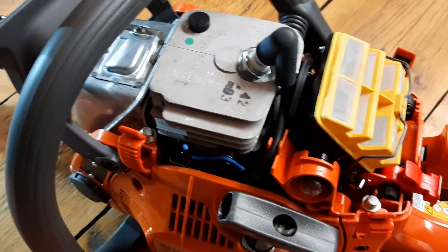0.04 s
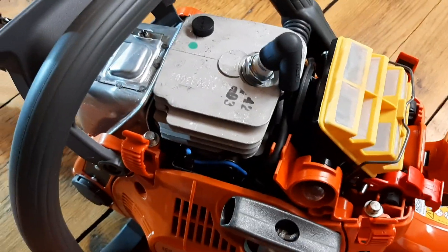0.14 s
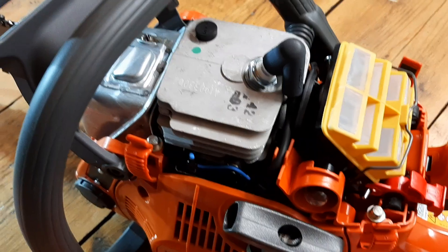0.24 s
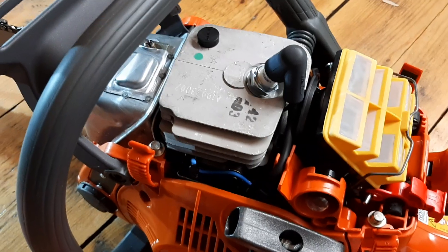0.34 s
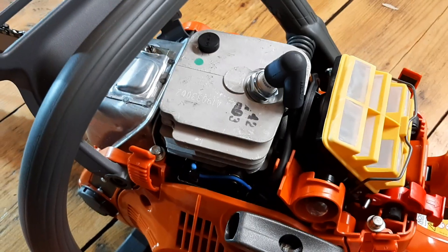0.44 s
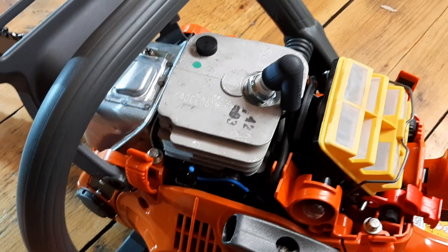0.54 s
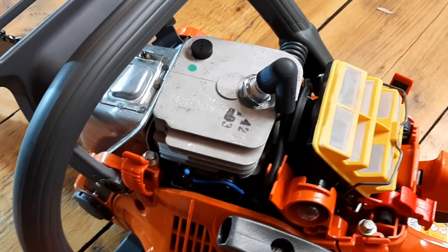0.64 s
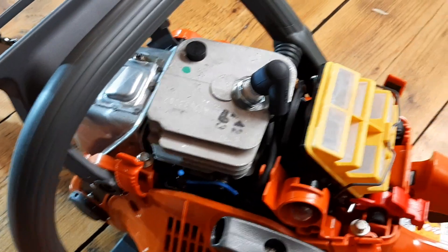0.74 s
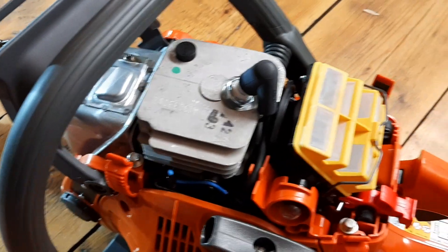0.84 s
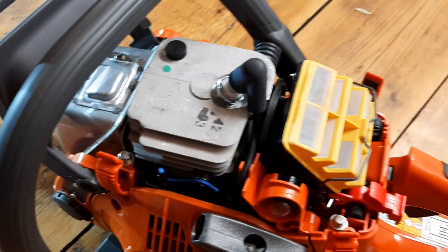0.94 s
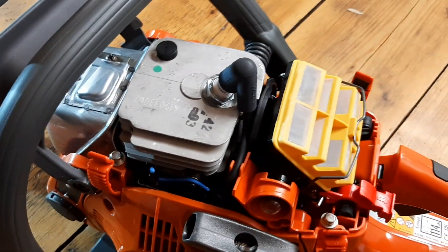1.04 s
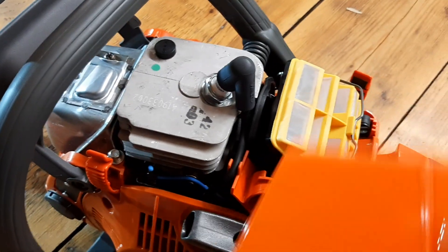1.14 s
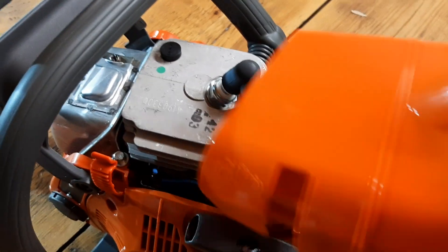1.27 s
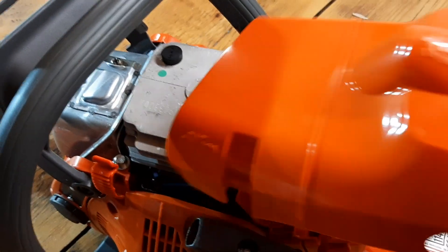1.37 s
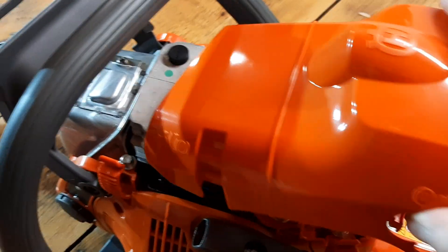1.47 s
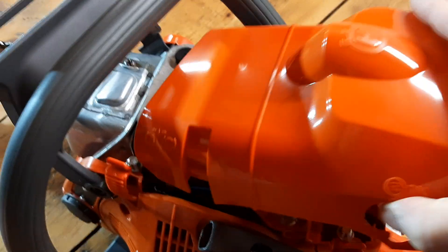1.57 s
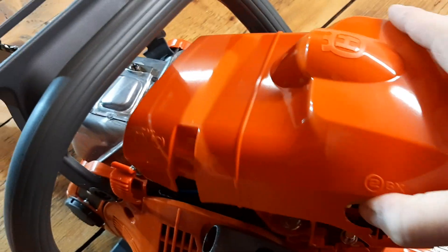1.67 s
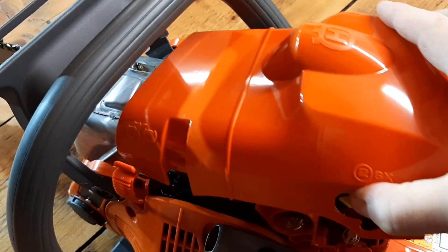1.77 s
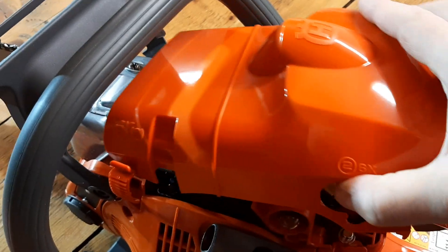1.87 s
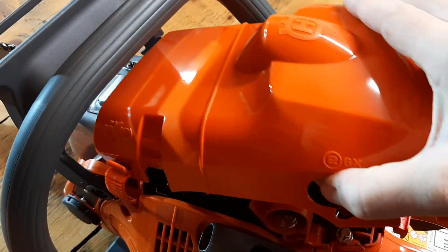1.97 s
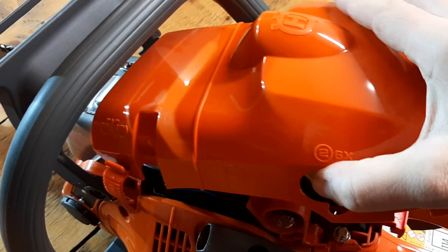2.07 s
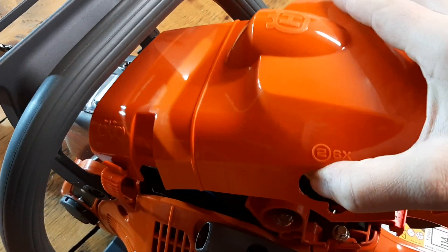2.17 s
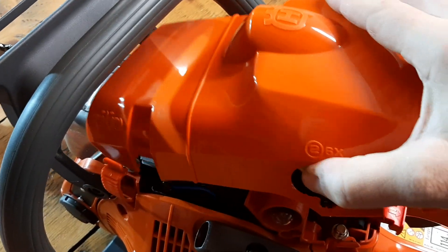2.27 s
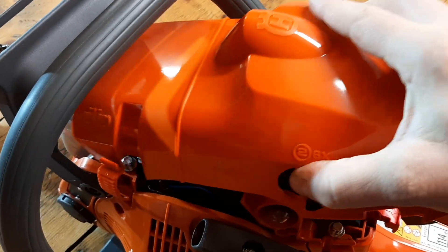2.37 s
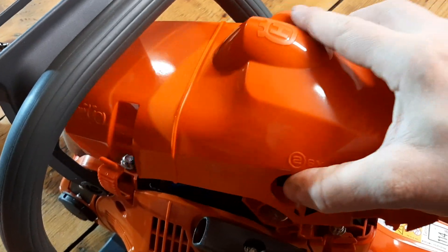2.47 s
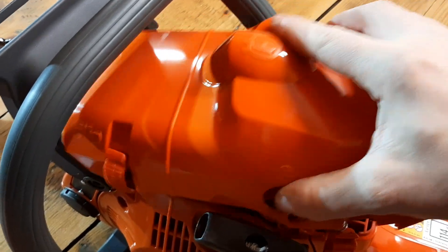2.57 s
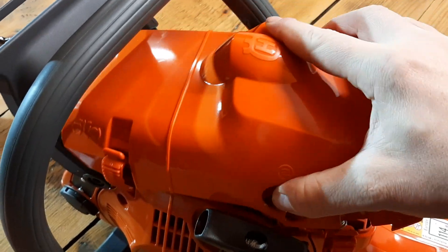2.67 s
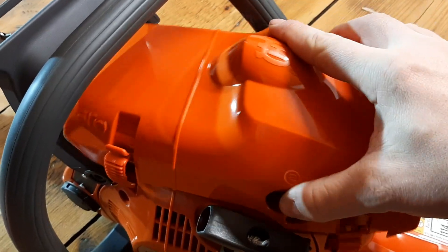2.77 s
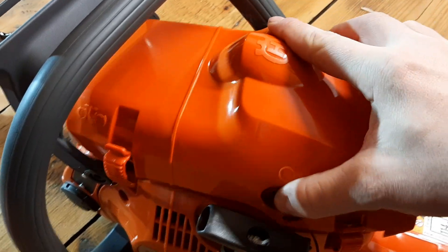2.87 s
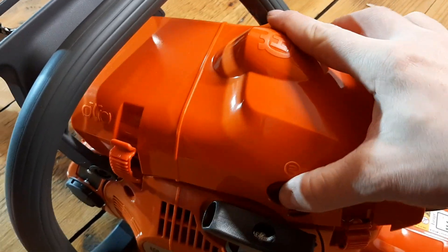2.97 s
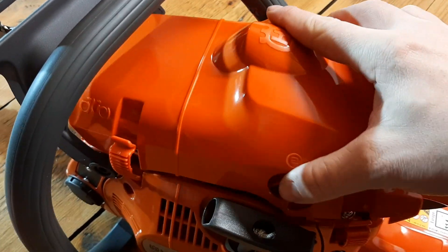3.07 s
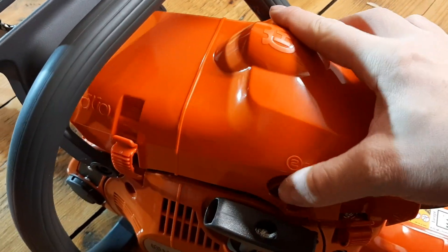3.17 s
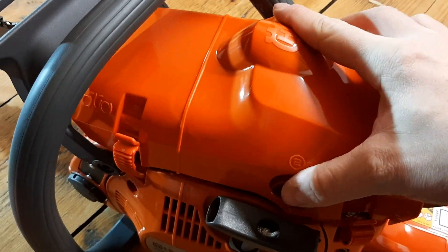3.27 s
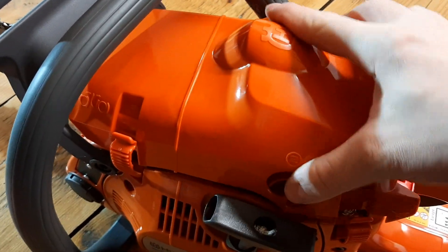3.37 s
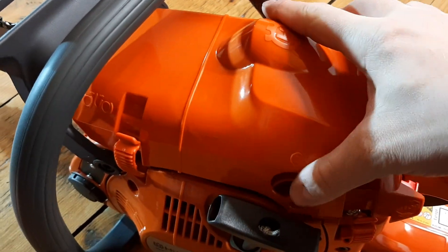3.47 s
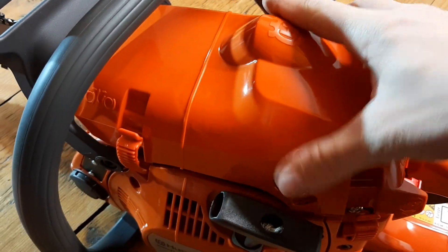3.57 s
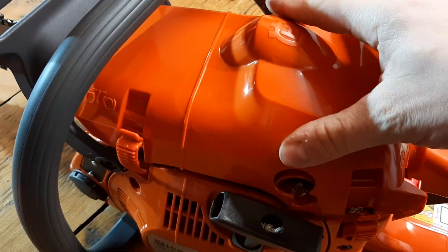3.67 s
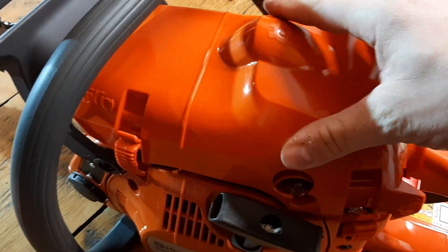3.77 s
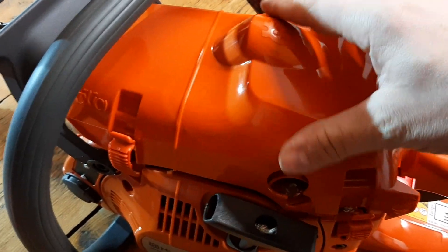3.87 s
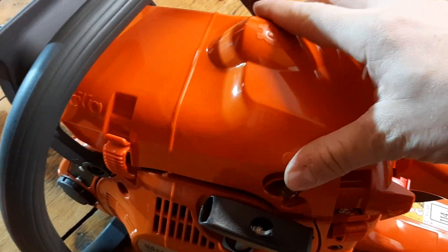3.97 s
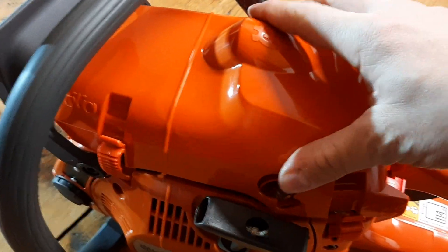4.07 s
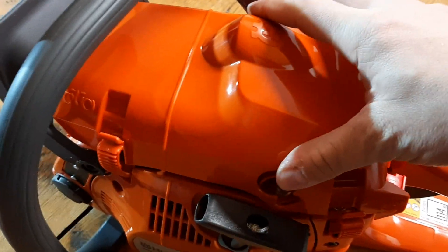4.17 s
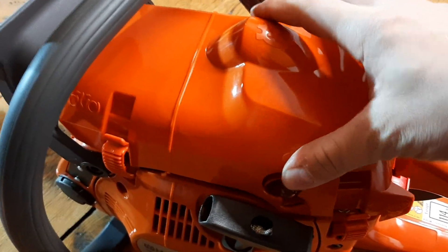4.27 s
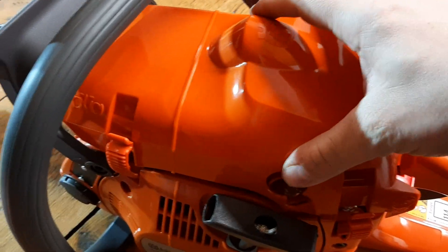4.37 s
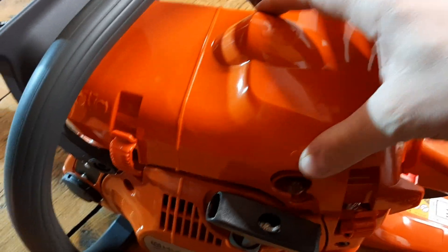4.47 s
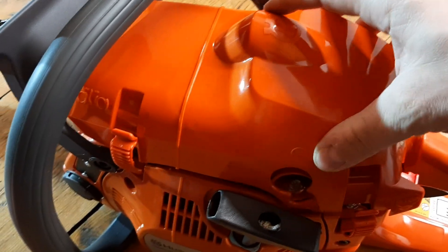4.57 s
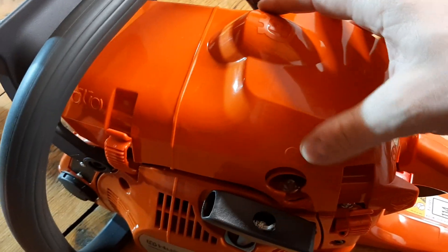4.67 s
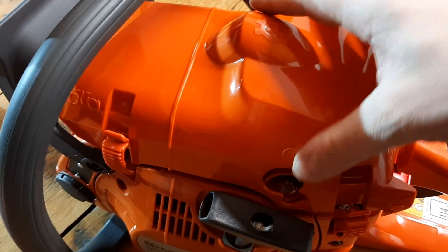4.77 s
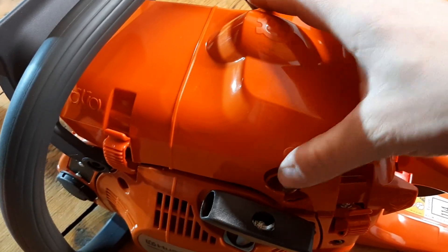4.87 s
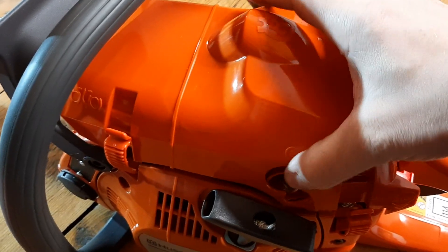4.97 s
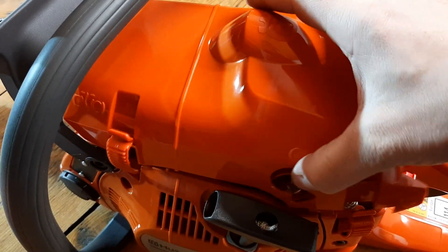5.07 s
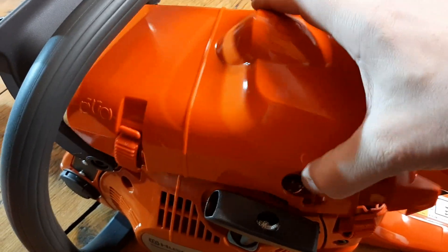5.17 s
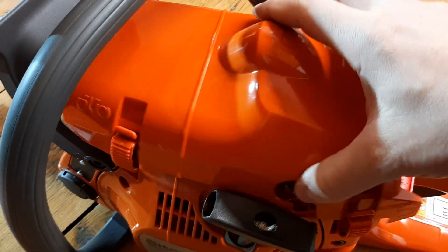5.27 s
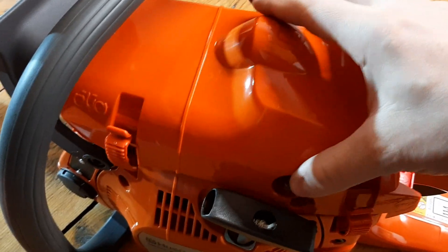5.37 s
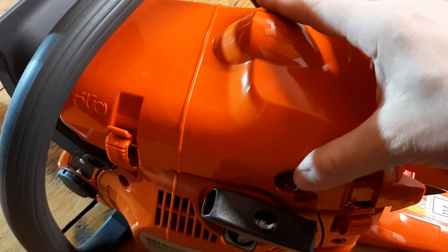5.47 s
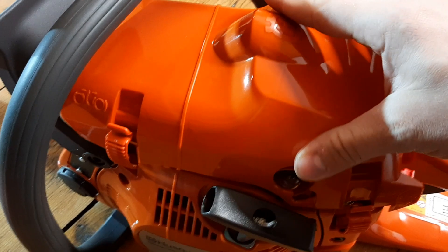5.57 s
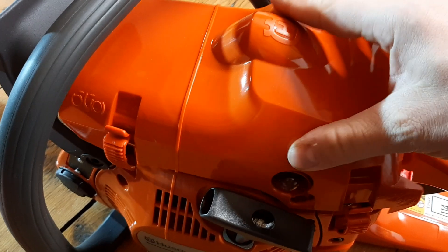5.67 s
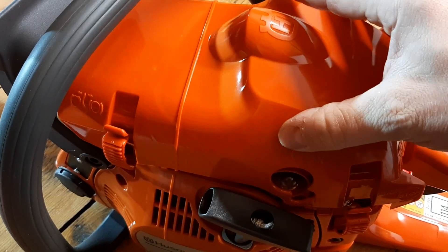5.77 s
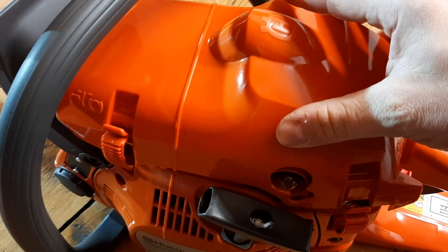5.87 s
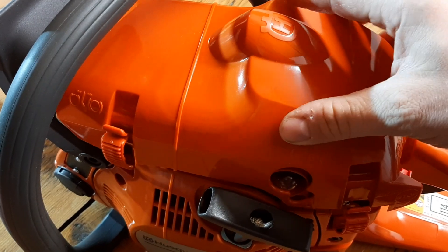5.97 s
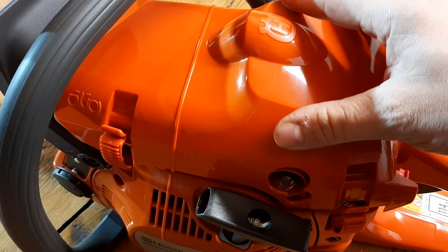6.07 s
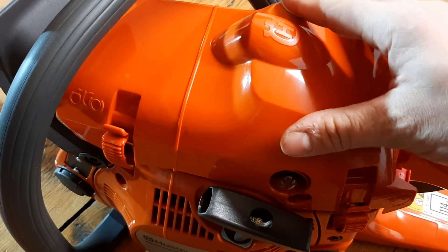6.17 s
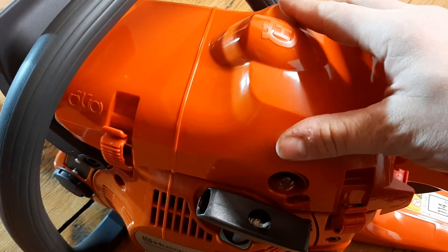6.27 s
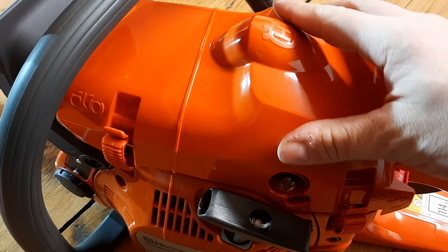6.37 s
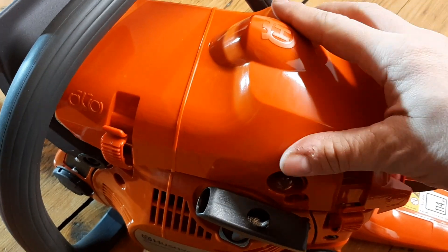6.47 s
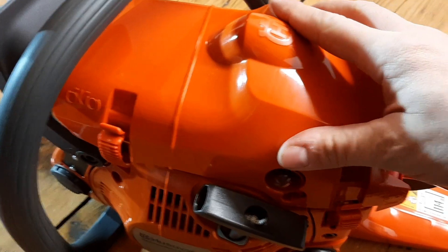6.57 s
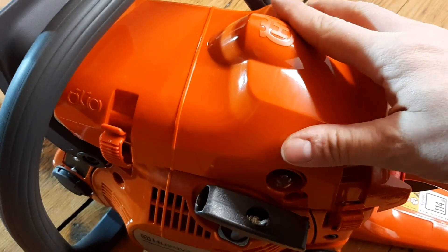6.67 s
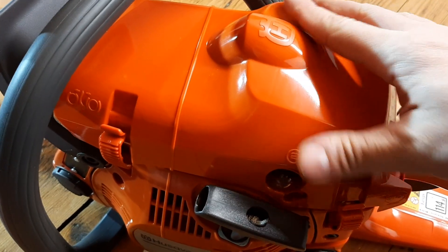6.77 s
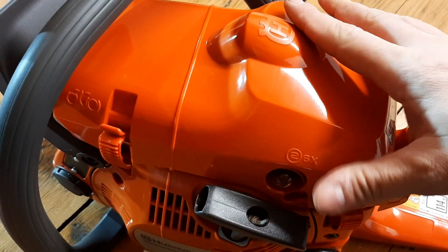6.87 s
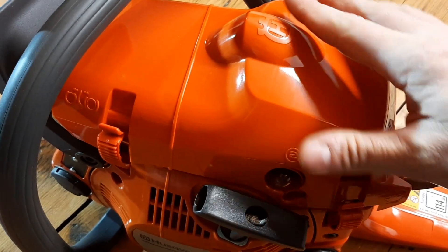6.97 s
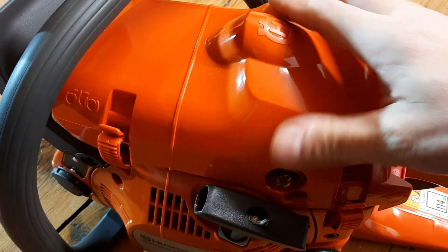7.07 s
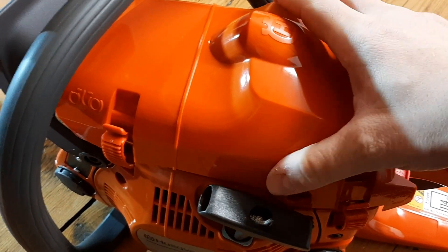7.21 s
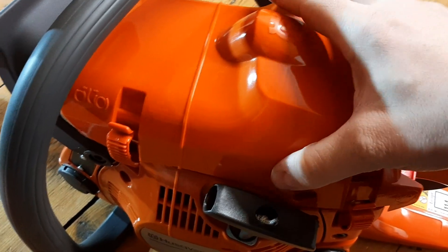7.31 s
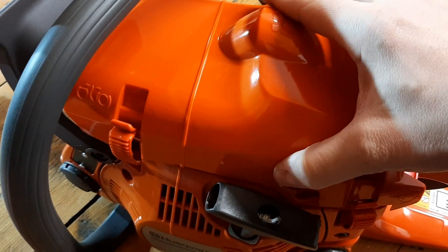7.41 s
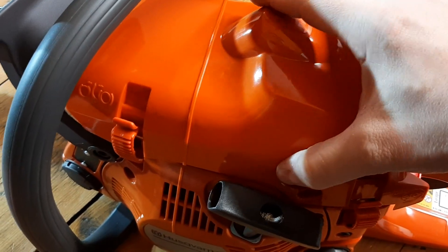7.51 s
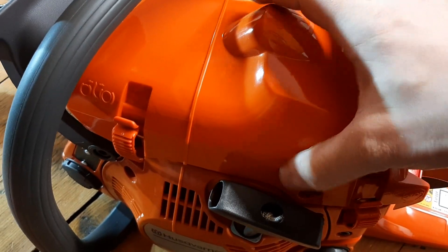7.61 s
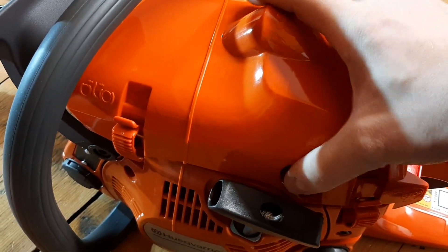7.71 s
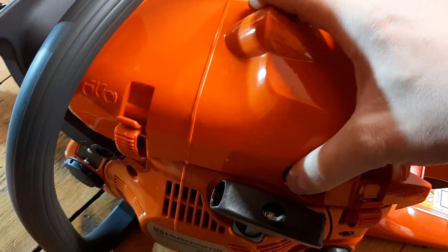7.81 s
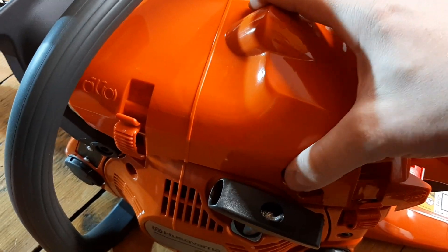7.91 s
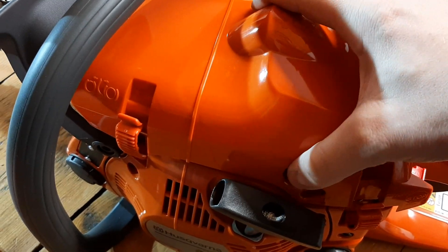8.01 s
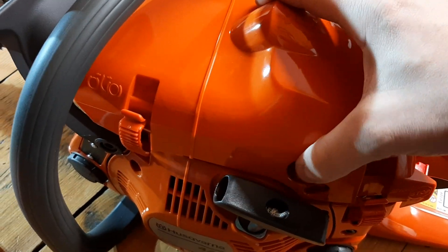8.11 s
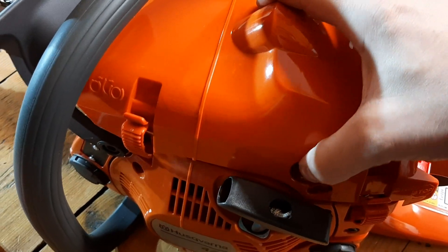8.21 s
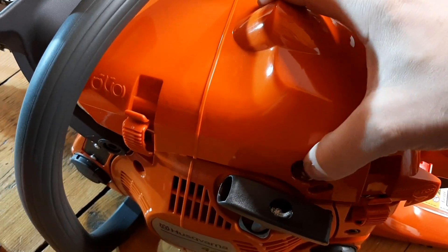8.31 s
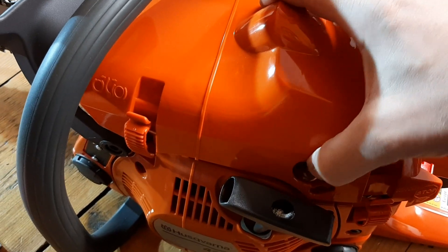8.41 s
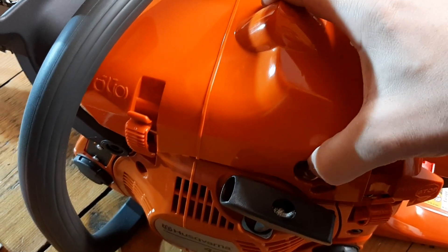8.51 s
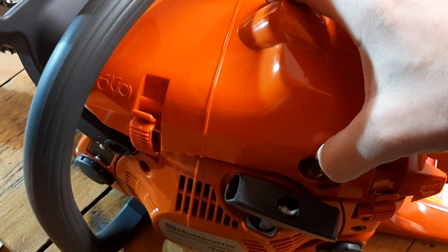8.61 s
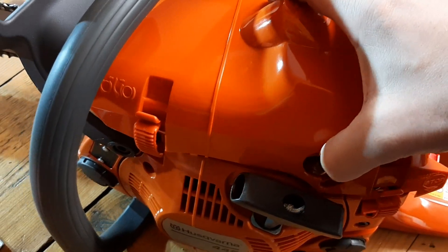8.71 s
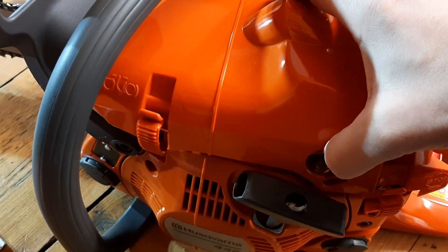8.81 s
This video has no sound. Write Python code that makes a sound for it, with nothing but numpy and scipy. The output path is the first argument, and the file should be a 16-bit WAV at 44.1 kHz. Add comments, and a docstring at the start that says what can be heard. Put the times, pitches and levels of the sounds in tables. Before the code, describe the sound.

Close-up handling of a plastic shell: loose hollow clacks, rubbing skin, sharp seating clicks, sparse firm knocks, then dull thumps on floorboards.

```python
"""Small quiet room with a board floor: a hard plastic cover is handled, slid and pressed onto a small machine.
Knocks and scrapes ring the shell's modes; skin slides over it with a flickering noise hiss.
The machine rocks and bumps the boards, which boom, and a faint tick runs for a while.
Early reflections and a diffuse tail answer the knocks, bumps and ticks; faint coloured noise is the still air."""
import sys
import numpy as np
from scipy import signal
from scipy.fft import rfft, irfft, next_fast_len
from scipy.io import wavfile
from scipy.ndimage import uniform_filter1d

SR = 44100
rng = np.random.default_rng(int(sys.argv[2]) if len(sys.argv) > 2 else 0)


def transcribe(u):
    """Save the signal u as a 16-bit wav file named by the first command-line argument.

    u: samples, shape (n,) or (channels, n), limited to [-1, 1]; the rate is SR.
    q: integer samples, one column per channel.
    """
    v = np.clip(np.atleast_2d(u).T, -1, 1)
    q = np.round(v * 32767).astype(np.int16)
    wavfile.write(sys.argv[1], SR, q)


def undo_db(level):
    """Turn decibels back into plain size, where 20 dB means ten times bigger."""
    steps = np.asarray(level, float) / 20
    return 10 ** steps


N = 390285
TIME = np.arange(N) / SR
RESPONSE_TIME = np.arange(int(.15 * SR)) / SR

# Modes of the plastic shell. Each row: frequency in Hz, relative level in dB,
# nominal t60 in s (before the cycle limit and stretch in ring()).
SHELL_MODES = [(205, -2, .08), (262, -7, .07), (330, -1, .11), (425, -6, .06), (480, -7, .06),
               (530, -7, .07), (598, -7, .07), (702, 0, .085), (770, -9, .07), (815, -9, .06),
               (925, -11, .05), (1100, -11, .045), (1222, -4, .05), (1350, -11, .04), (1600, -13, .03),
               (1950, -14, .025), (2380, -5, .025), (2650, -10, .02), (3500, -12, .015), (4370, -10, .013)]
SEATED_S = 1.4  # held in the air before this, pressed on the machine after
FREE_EVEN = 1.4  # factor on the mode dB: in the air the strong modes stand out
SEATED_LOWEST_DB = -14.5  # the machine holds the lowest mode down


def level(x, db=0):
    """Scale to an rms level in dB."""
    return x * undo_db(db) / np.sqrt(np.mean(x ** 2))


def along(table, hz):
    """Read a (Hz, value) table on a log-frequency axis."""
    table_hz, value = np.transpose(table)
    return np.interp(np.log(np.maximum(hz, 1)), np.log(table_hz), value)


def colour(x, table):
    """Causal filter with a (Hz, dB) spectrum: the phase comes from the folded cepstrum of the log gain."""
    size = 2 * next_fast_len(x.shape[-1] // 2 + 1024)
    gain_db = along(table, np.fft.rfftfreq(size, 1 / SR))
    cepstrum = irfft(np.log(undo_db(gain_db)), size)
    cepstrum[1:size // 2] *= 2
    cepstrum[size // 2 + 1:] = 0
    response = np.exp(rfft(cepstrum))
    return irfft(rfft(x, size) * response, size)[..., :x.shape[-1]]


def pair(length, split_hz):
    """Noise at two microphones: alike in the bass, unrelated well above split_hz."""
    mid, side = rng.standard_normal((2, length))
    side = signal.lfilter(*signal.butter(1, split_hz, "high", fs=SR), side)
    return np.array([mid + side, mid - side])


def flutter(rate_hz, depth_db):
    """Random gain: values held for 1 / rate_hz seconds, then slewed by a moving average."""
    hold = int(SR / rate_hz)
    steps = np.repeat(rng.standard_normal(N // hold + 1), hold)
    return undo_db(depth_db * uniform_filter1d(steps, hold)[:N])


def resonate(x, hz, width_hz):
    """Two-pole resonance with gain 1 at its centre."""
    return signal.lfilter(*signal.iirpeak(hz, hz / width_hz, SR), x)


def ring(modes, stretch=1.0, detune=0., split_hz=1200):
    """Decaying modes after one impulse; high modes reach the two microphones with their own phase and size."""
    hz, db, t60_s = np.transpose(modes)[:, :, None]
    t60_s = np.minimum(t60_s, 60 / hz) * stretch  # inner loss: at most 60 cycles before the stretch
    chance = rng.standard_normal((4, len(modes), 1))
    apart = np.minimum(hz / split_hz, 1) ** 2 * np.array([1, -1])[:, None, None]
    size = undo_db(db + 2.5 * chance[0] + 3.0 * apart * chance[1])
    phase = 2 * np.pi * hz * (1 + detune * chance[2]) * RESPONSE_TIME + 0.6 * apart * chance[3]
    decay = np.exp(-np.log(1000) * RESPONSE_TIME / t60_s)
    return (size * np.sin(phase) * decay).sum(axis=1)


def rattle(response, decay_ms, blow=0.72):
    """Drive a response with a first blow, holding a share of the energy, and a spiky rattle that dies away."""
    t = np.arange(int(.06 * SR)) / SR
    force = rng.standard_normal(len(t)) ** 3 * np.exp(-t / (np.clip(decay_ms, .2, 20) / 1000))
    force = force * np.sqrt((1 - blow) / np.sum(force ** 2))
    force[0] = np.sqrt(blow)
    return signal.fftconvolve(response, force[None], axes=1)


def strokes(table, column):
    """Gain curve of overlapping strokes, each swelling to its top and fading; powers add."""
    edge_db, roundness = -18.5, 1.885  # level one swell before or one fade after the top; 1 = pointed, 2 = round
    power = np.full(N, 1e-14)
    for row in table:
        top_s, swell_s, fade_s = row[:3]
        before = (top_s - TIME) / max(swell_s, .01)
        after = (TIME - top_s) / max(fade_s, .01)
        off = np.where(TIME < top_s, before, after)
        power = power + undo_db(2 * (row[column] + edge_db * np.minimum(off, 4) ** roundness))
    return np.sqrt(power)


def add(out, start_s, x):
    """Mix x into out from start_s."""
    i = int(start_s * SR)
    out[:, i:i + x.shape[1]] += x[:, :N - i]


def still_air():
    """Faint steady noise of the room's air: coloured Gaussian noise."""
    # Each row: frequency in Hz, relative level in dB.
    spectrum = [(15, -38.5), (25, -3), (141, 12), (217, 0), (545, 5), (988, -14.5), (1560, -13.5),
                (2550, -19.5), (3820, -9.5), (6380, -5), (8360, -24.5), (14800, -12), (16000, -34)]
    return level(colour(pair(N, 730), spectrum), -72)


def room(x):
    """Dense early reflections from boards and machine, then a diffuse tail with its own decay in each octave."""
    # Each row: frequency in Hz, t60 of the tail in s.
    tail_t60 = [(150, 0.13), (500, 0.48), (1500, 0.54), (4000, 0.33), (10000, 0.31)]
    early_db, early_t60_s, tail_db = -2.5, 0.14, -10
    t = np.arange(int(.9 * SR)) / SR
    noise, tail = pair(len(t), 700), 0
    for hz in 90 * 2. ** np.arange(0, 8):
        edges_hz = [hz / 2 ** .5, hz * 2 ** .5]
        band = signal.sosfilt(signal.butter(2, edges_hz, "band", fs=SR, output="sos"), noise)
        tail = tail + band * np.exp(-np.log(1000) * t / along(tail_t60, hz))
    tail = tail * np.clip((t - .006) / 0.0011, 0, 1)
    early = pair(len(t), 900) * np.exp(-np.log(1000) * t / early_t60_s) * np.clip(t / 0.00088, 0, 1)
    response = (level(early, early_db) + level(tail, tail_db)) / np.sqrt(len(t))
    return signal.fftconvolve(x.mean(axis=0, keepdims=True), response, axes=1)[:, :N]


def ticks():
    """A faint, narrow tick: two short modes, at first sixteen a second and slowly quickening."""
    # Each row: frequency in Hz, relative level in dB, nominal t60 in s (before the cycle limit in ring()).
    tick_modes = [(1555, 0, .03), (5300, -7, .012)]
    # Each row: time in s, mean level in dB.
    tick_level = [(6.69, -64), (7.1, -53.5), (7.9, -55.5), (8.1, -64), (8.46, -61)]
    count, from_s, gap_s, quickens_s = 33, 6.689, .0623, .00045  # each gap shorter by quickens_s
    scatter_db, scatter_s, attack_s = 1.5, .002, .0015
    out, k = np.zeros((2, N)), np.arange(count)
    times_s = from_s + gap_s * k - quickens_s * k ** 2 / 2
    chance = rng.standard_normal((count, 2))
    soft = np.clip(RESPONSE_TIME / attack_s, 0, 1)
    for s, (late, loud) in zip(times_s, chance):
        db = np.interp(s, *np.transpose(tick_level)) + scatter_db * loud
        add(out, s + scatter_s * late, undo_db(db) * ring(tick_modes, split_hz=4500.0) * soft)
    return out


def rocking():
    """The machine shifts under the hand and bumps the boards, whose modes boom."""
    # Firm bumps. Each row: start in s, relative level in dB, gain at 320 Hz in dB.
    firm = [(7.622, -46.5, 7.5), (7.655, -37, 1.5), (7.753, -41, 4), (7.813, -51.5, 2),
            (7.972, -37.5, -13.5), (8.011, -46.5, -6), (8.141, -43.5, -5), (8.18, -53, 6),
            (8.262, -47.5, -5), (8.394, -38, -14), (8.438, -45, -9), (8.61, -45.5, -14),
            (8.647, -42.5, -10), (8.707, -47, -17.5), (8.762, -51, -13)]
    # Each row: frequency in Hz, relative level in dB, nominal t60 in s (before the stretch in ring()).
    board_modes = [(106, -10, 0.15), (135, 1, 0.22), (221, -4, 0.07), (325, 3.5, 0.17)]
    # light trembling bumps among the firm ones
    tremble_from_s, tremble_gap_s, tremble_db, tremble_upper_db = 7.68, .05, -57, -5
    out = np.zeros((2, N))
    times_s = np.arange(tremble_from_s, N / SR - .05, tremble_gap_s)
    chance = rng.standard_normal((len(times_s), 2))
    light = [(s + .012 * late, tremble_db + 2.5 * loud, tremble_upper_db)
             for s, (late, loud) in zip(times_s, chance)]
    for s, db, upper_db in firm + light:
        boom = rattle(ring(board_modes, 0.79, 0.031, 4000.), decay_ms=9)
        tilt = [(40, -26), (90, -0.5), (170, 1.0), (320, upper_db), (600, -4.0)]
        add(out, s, undo_db(db - 4.0) * colour(boom, tilt))
    return out


def sliding_skin():
    """Skin slides over the shell: fluttering noise hisses, with an airy top that has its own level curve."""
    # Each row: strongest at s, swell in s, fade in s, top rms level in dB.
    slides = [(0, .05, 0.12, -54), (.17, .1, 0.11, -49.5), (.42, 0.19, 0.32, -52.5),
              (.8, 0.33, 0.23, -47.5), (1.1, 0.44, 0.39, -60.5), (1.5, 0.31, 0.18, -60),
              (1.66, 0.074, 0.13, -41.5), (1.88, 0.47, 0.18, -52), (2.22, 0.077, .15, -61),
              (2.41, 0.17, 0.057, -52), (2.58, 0.09, 0.14, -32), (3.03, 0.2, 0.17, -59),
              (3.23, .15, 0.23, -56), (3.8, 0.37, 0.068, -60), (3.97, 0.22, 0.26, -58.5),
              (4.46, 0.23, 0.28, -60.5), (4.87, 0.12, 0.16, -61.5), (5.2, 0.048, 0.086, -45.5),
              (5.64, 0.31, 0.27, -61), (6.14, 0.18, 0.29, -58.5), (6.41, 0.13, 0.18, -61),
              (7.14, 0.12, 0.21, -61), (7.33, 0.09, 0.28, -59), (7.66, 0.12, 0.16, -56),
              (7.88, 0.053, 0.094, -62), (8.09, 0.059, 0.049, -65.5), (8.32, 0.057, 0.05, -63.5),
              (8.56, 0.046, 0.14, -62), (8.83, 0.27, .1, -64)]
    # Each row: frequency in Hz, relative level in dB.
    hiss_spectrum = [(470, -28), (800, 0), (1060, -4), (1660, -2), (1820, 5), (2510, 0), (3200, 2),
                     (3800, 5), (4500, 2), (5600, -0.5), (7500, -3), (9000, -83.5), (11700, -46),
                     (19800, -120)]
    # Each row: frequency in Hz, relative level in dB.
    airy_spectrum = [(7000, -36.5), (8600, -5), (10000, -5), (12000, 0), (14000, -3.5), (16000, -4)]
    # Each row: time in s, rms level of the airy top in dB.
    airy_level = [(0.0, -70.5), (0.86, -56), (0.98, -69), (1.5, -74.5), (1.8, -65), (1.97, -80),
                  (2.32, -83), (2.44, -61.5), (2.71, -74), (2.91, -83.5), (3.57, -84), (3.92, -71),
                  (4.16, -79.5), (5.1, -78.5), (5.18, -81), (7.07, -85), (7.22, -78.5), (8.85, -82)]
    hiss = colour(pair(N, 1200) * flutter(60, 2.0) * flutter(900, 2.5), hiss_spectrum)
    airy = colour(pair(N, 1200) * flutter(44, 1.5) * flutter(26, 3.0), airy_spectrum)
    airy_gain = undo_db(np.interp(TIME, *np.transpose(airy_level)))
    return level(hiss) * strokes(slides, column=3) + level(airy) * airy_gain


def scraping():
    """The shell scrapes on the machine: stick-slip grit excites its modes, widened by the rubbing contact."""
    # Each row: strongest at s, swell in s, fade in s, top of the dull drag in dB, top of the light scrape in dB.
    scrapes = [(0, .05, .1, -48.5, -54.5), (.19, 0.07, .09, -46, -47.5), (.42, 0.13, 0.088, -45, -61.5),
               (.62, 0.17, 0.3, -72.5, -58.5), (1.54, .25, 0.21, -61.5, -65.5),
               (1.72, 0.18, 0.19, -43, -55.5), (1.96, .1, .18, -52, -62.5),
               (2.23, 0.083, .15, -62.5, -57.5), (2.45, 0.46, 0.18, -50.5, -51.5),
               (2.65, 0.22, 0.25, -55.5, -44.5), (3.1, 0.44, .35, -81, -65), (3.75, 0.088, .2, -64.5, -57),
               (3.96, 0.18, 0.3, -64.5, -55.5), (4.46, .15, 0.18, -63, -57.5),
               (5.2, .15, 0.095, -53.5, -49.5), (5.31, .1, 0.25, -56.5, -58), (5.65, 0.14, 0.2, -66, -57),
               (6.14, 0.17, 0.22, -53.5, -51), (6.36, 0.26, .32, -72.5, -60),
               (7.32, 0.17, 0.23, -68.5, -55), (7.71, 0.18, 0.055, -75, -60),
               (7.88, 0.19, 0.13, -61.5, -73.5), (8.1, 0.092, 0.11, -65, -68.5),
               (8.31, 0.087, 0.081, -73.5, -64), (8.6, 0.056, 0.9, -67.5, -72),
               (8.84, 0.14, 0.11, -61, -75)]
    drag_below_hz = 450  # lower modes answer a slow, heavy drag, the others a light scrape
    seated_even, damping = 0.5, 2.4  # factor on the mode dB; mode width in Hz times its t60
    grit = pair(N, 2500) * flutter(180, 3.0) * flutter(35, 3.0)
    even = np.where(TIME < SEATED_S, FREE_EVEN, seated_even)
    drag, scrape = np.zeros((2, 2, N))
    for i, (hz, db, t60_s) in enumerate(SHELL_MODES):
        mode = undo_db(db * even) * resonate(grit, hz, damping / t60_s)
        if i == 0:
            mode = mode * undo_db(SEATED_LOWEST_DB * (TIME > SEATED_S))
        if hz < drag_below_hz:
            drag += mode
        else:
            scrape += mode
    return level(drag) * strokes(scrapes, column=3) + level(scrape) * strokes(scrapes, column=4)


def knocks():
    """Each contact rattles the shell modes and cracks; returns the direct sound and what the room gets."""
    # Each row: start in s, relative body level in dB, then against the body in dB:
    # thud (250 Hz), clack (2300 Hz free, 1600 Hz seated), snap (4500 Hz).
    contacts = [(.001, -34, -2, 3, -28), (.15, -31.5, -17, -14, -25), (.163, -33, 1, 2, -25),
                (0.181, -38.5, 12, 10, -11), (.218, -20, -28, -1.5, -14), (.231, -22.5, -11, -10, -15),
                (.36, -32.5, -14, 0, -28), (.382, -18.5, -40, -12, -18), (.397, -19, -14, -10, -34),
                (.423, -34, 2, -9, -10), (0.448, -38.5, -22.5, 21, 0), (.518, -28.5, -8, 6.5, -23),
                (.835, -37.5, -9, 22, 16), (.963, -26.5, -21.5, 12, 7), (1.608, -10, -10, -16.5, -11.5),
                (1.907, -42.5, -18.5, 8, -2), (1.925, -44, -4, 7.5, -5), (1.949, -39.5, 2.5, 9, -10),
                (1.974, -41, 5, 1, -7.5), (2.142, -46, -1, 2, -8), (2.262, -6.5, -15.5, -18, -18.5),
                (2.284, -15.5, -15.5, -0.5, -2), (2.426, -35.5, -22, -6.5, -4),
                (2.486, -34, 3.5, -6.5, -13.5), (2.506, -27, -13, -5.5, -8), (2.533, -7.5, -8.5, -18.5, -5),
                (2.547, -9.5, -9.5, -13.5, 4), (2.556, -14, -25, -7, -1.5), (2.567, -11, -31.5, -3, -13.5),
                (2.58, -5.5, -20, -11.5, -12.5), (2.588, -11.5, -30, -10, -0.5),
                (2.596, -12.5, -26.5, -8.5, 0), (2.611, -27.5, -30.5, -7.5, 0),
                (2.621, -32.5, -27, -5.5, 5), (2.731, -27, -16, -2, -8), (2.79, -25, -16, -6, -9),
                (2.811, -24, -19, -3, -2), (2.858, -33, -2, -2, -17), (2.882, -19.5, -12, -4, -3.5),
                (2.94, -36, -3.5, 12, -5), (3.083, -37.5, -8, -1, -14.5), (3.102, -39, 5.5, 6.5, -4),
                (3.174, -32, -2, 2.5, -1), (3.226, -40.5, -12, -2, 13), (3.336, -40.5, -6.5, -31, -21.5),
                (3.648, -49, -33, 5.5, 7.5), (3.737, -35, -11.5, -11, -12.5), (3.899, -38, -43, -28, -0.5),
                (4.063, -34, -8, 0.5, 3.5), (4.322, -19, -23, -18, -22.5), (4.449, -39, -30, -28, -5),
                (4.557, -43, -14.5, -7.5, -5.5), (4.976, -35.5, -13.5, -29.5, -28),
                (5.054, -46, -22.5, 1.5, 7), (5.071, -36, -6.5, -2.5, -1.5),
                (5.084, -28.5, -41.5, 16.5, 6.5), (5.098, -19.5, -30, -9, -24),
                (5.112, -28, -13.5, 10, -5.5), (5.126, -23.5, -7, 1, 1), (5.139, -25.5, -6, 10, -21.5),
                (5.184, -21.5, -5.5, -1, -22), (5.244, -21, -15.5, -3.5, -21.5),
                (5.264, -5.5, -23.5, -4, -23), (5.342, -35, -22.5, 12, 4.5), (5.481, -45.5, 1.5, 12, 1.5),
                (5.514, -28, -10, 6, -8), (5.649, -36.5, -7.5, -9.5, -16.5),
                (5.736, -37.5, -17.5, -16.5, -10.5), (5.8, -41.5, -2, -5.5, -12),
                (5.959, -44.5, 1.5, -3, -6.5), (6.02, -34, -4, 2.5, -2), (6.108, -2, -18, -7.5, -15),
                (6.431, -36.5, -18.5, -21, -10), (6.613, -43, -13, -8, -26), (7.229, -53, -19, 19, -8),
                (7.237, -32, -27, 11, 2.5), (7.264, -41, -15, 2.5, -1), (7.321, -40.5, -28, 6.5, 4.5),
                (7.39, -40, -22, -11, 2.5), (7.598, -18.5, -16.5, -13.5, -16), (7.709, -49.5, -8, 9, -2),
                (7.727, -46, 7, 6, -1.5), (8.832, -48, -11, -10.5, -8)]
    # Crack of contact. Each row: frequency in Hz, relative level in dB.
    snap_spectrum = [(710, -33.5), (1200, 8.5), (2560, 7), (4040, 7), (4450, 2.5), (4800, 1.5),
                     (6510, -2.5), (9310, -22.5), (13500, -42), (16000, -43.5)]
    # held loosely in the air it rings longer and is touched more softly
    free_ring, free_detune, free_crack_db = 1.5, 0.0015, -13
    # pressed on the machine the modes shorten, wander and differ less in level
    seated_ring, seated_detune, seated_even = .75, .025, 0.29
    # rattle decay at a 0 dB snap; spread of its logarithm; a snap brighter by halves_db rattles half as long
    chatter_ms, chatter_spread, halves_db = 1.5, .2, 19
    direct, spread = np.zeros((2, 2, N))
    t = RESPONSE_TIME
    click = colour(np.ones((2, 1)) * (t == 0), snap_spectrum)
    for s, db, thud_db, clack_db, snap_db in contacts:
        decay_ms = chatter_ms * 2 ** (-snap_db / halves_db) * np.exp(chatter_spread * rng.standard_normal())
        free = s < SEATED_S
        modes = np.array(SHELL_MODES) * [1, FREE_EVEN if free else seated_even, 1]
        if free:
            crack_db, clack_hz = free_crack_db, 2300
            body = ring(modes, free_ring, free_detune)
            blurred = ring(modes, .9, 0)
        else:
            crack_db, clack_hz = 0, 1600
            modes[0, 1] += SEATED_LOWEST_DB
            body = ring(modes, seated_ring, seated_detune)
            blurred = ring(modes, .2, 2 * seated_detune)
        crackle = colour(pair(len(t), 1500) * np.exp(-t / 0.0058), snap_spectrum)
        crack = undo_db(25.0) * click + undo_db(8.5) * crackle
        # a soft, long contact loses the top octave faster than a hard one
        tilt = [(250, thud_db), (420, 0.27 * thud_db), (650, 0.0063), (clack_hz, clack_db),
                (4500, snap_db), (11000, 1.9 * snap_db - 0.8 * decay_ms)]
        near = rattle(body + undo_db(crack_db) * crack, decay_ms)
        add(direct, s, undo_db(db - 9) * colour(near, tilt))
        # summed over all directions the modes blur into a smooth spectrum
        around = blurred + undo_db(28.0 + crack_db) * click
        add(spread, s, undo_db(db - 7.5) * colour(around, tilt))
    return direct, spread


def scene():
    """Near sources, the room's answer to knocks, bumps and ticks, and the still air."""
    # a small shell radiates no deep bass
    no_bass = signal.butter(3, 170, "high", fs=SR, output="sos")
    blows, spread = signal.sosfilt(no_bass, knocks())
    small = ticks() + rocking()
    rub = scraping() + sliding_skin()
    return blows + small + room(spread + small) + rub + still_air()


def band_limit(x):
    """A steep low-pass at the top of the band."""
    return signal.sosfilt(signal.butter(12, 16460, fs=SR, output="sos"), x)


def record(dry):
    """The left microphone is a little more sensitive; the loudest peaks round off."""
    x = dry * undo_db(np.array([[.4], [-.4]]))
    mix = np.tanh(0.78 * x) / 0.77
    return band_limit(mix)


dry = scene()
out = record(dry)
transcribe(out)
```